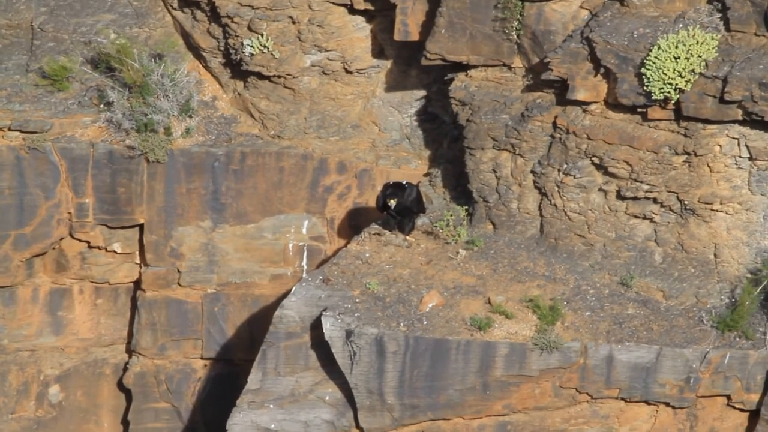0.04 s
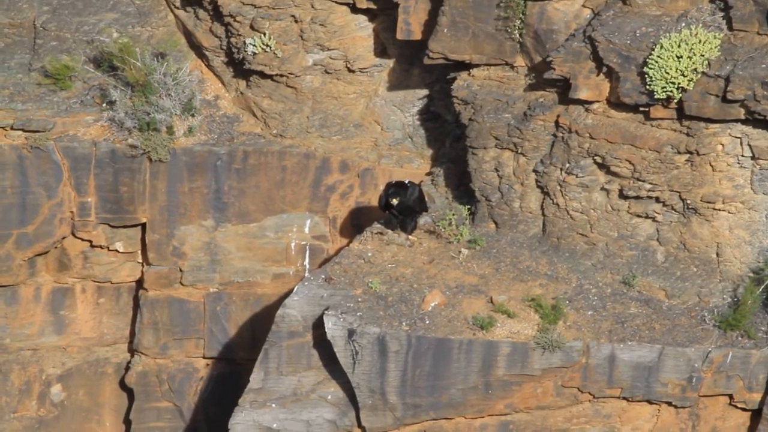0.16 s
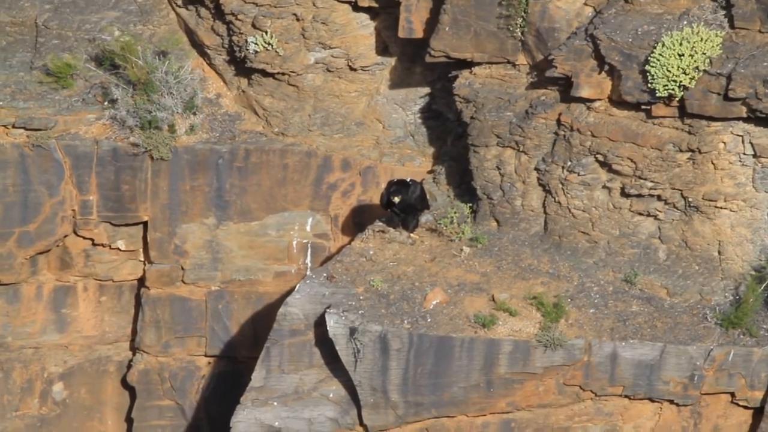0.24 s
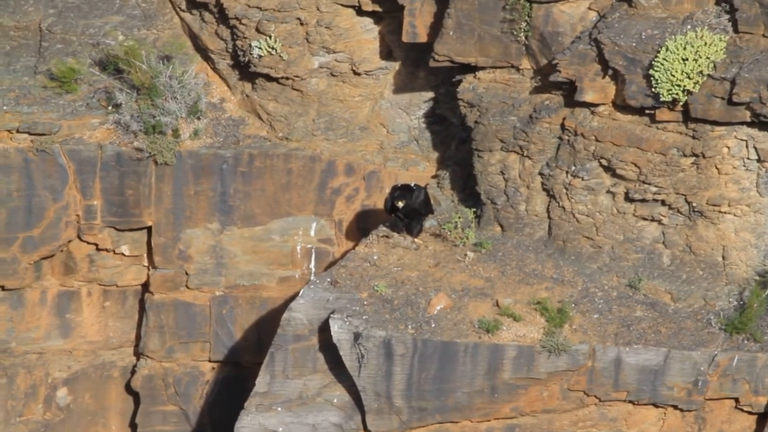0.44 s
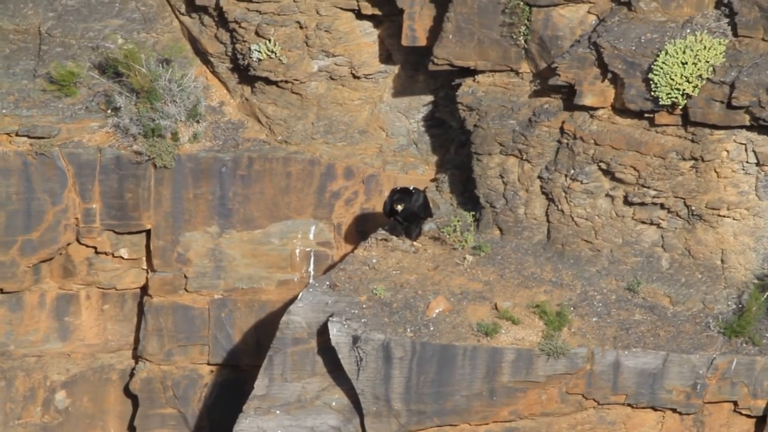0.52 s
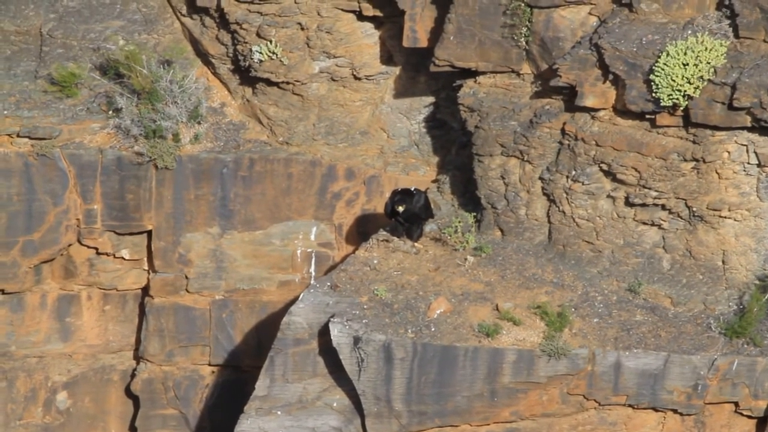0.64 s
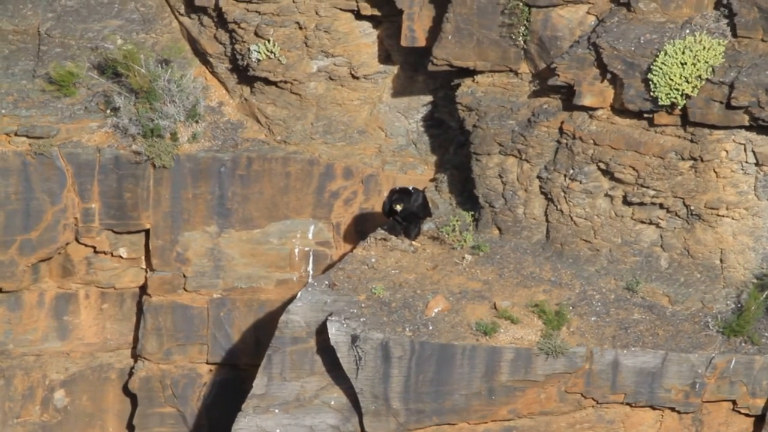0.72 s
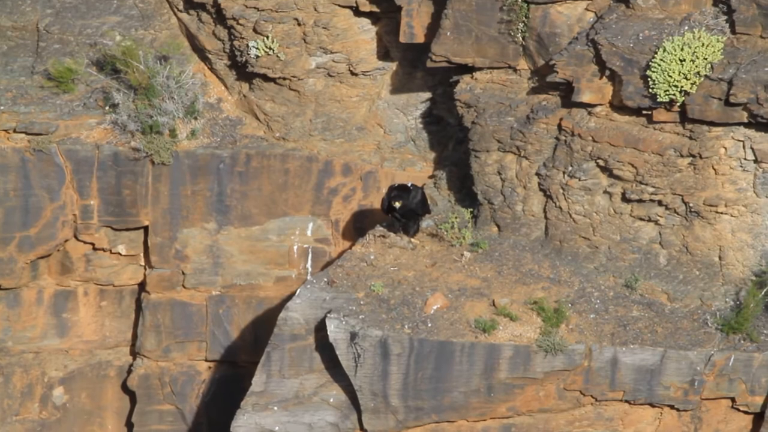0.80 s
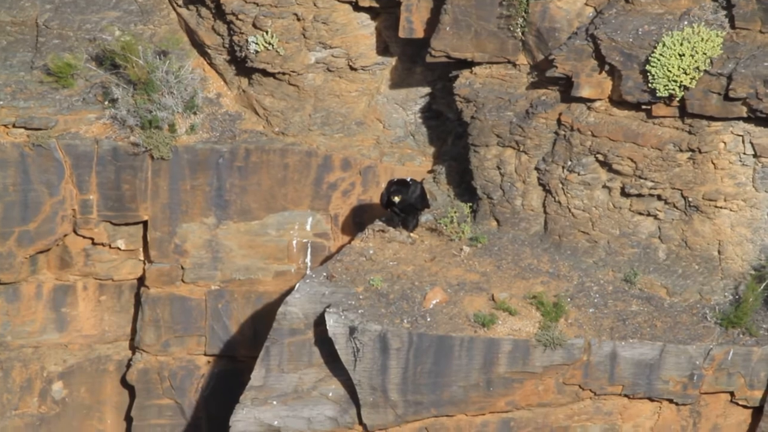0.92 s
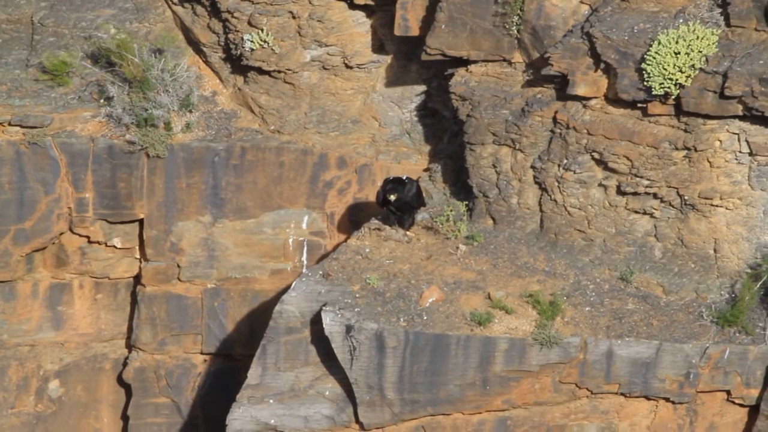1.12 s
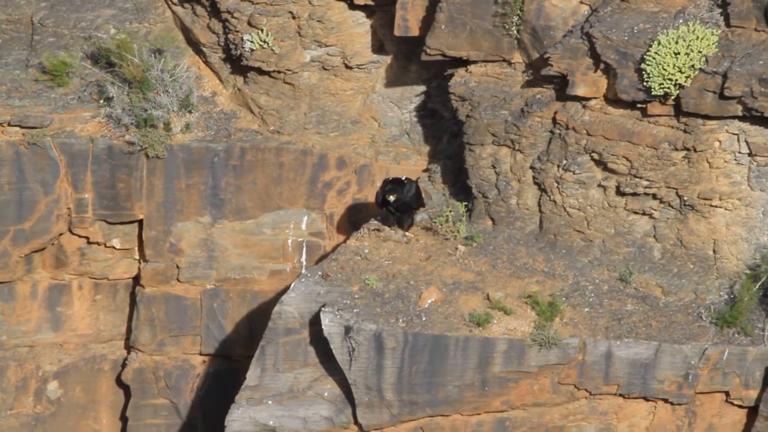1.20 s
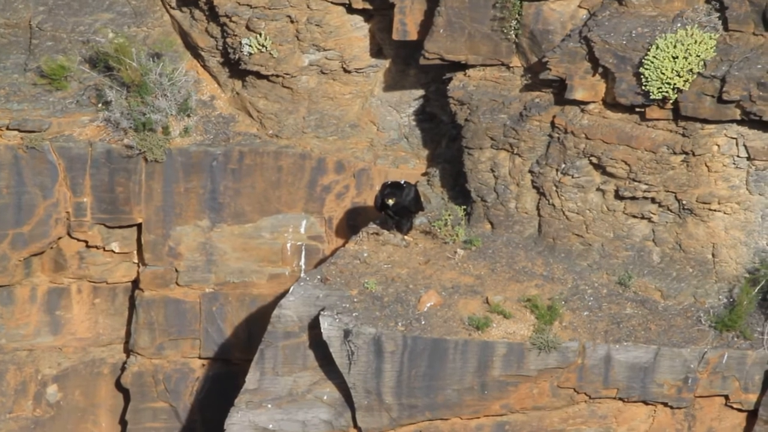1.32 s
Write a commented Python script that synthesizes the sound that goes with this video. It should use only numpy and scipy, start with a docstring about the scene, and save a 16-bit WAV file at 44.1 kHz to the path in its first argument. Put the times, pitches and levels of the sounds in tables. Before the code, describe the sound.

An eagle's short rising whistle and raspy yelp echo among rocks over faint wind.

```python
"""Faint wind blows, and the echo of an eagle's earlier call is dying away in the gorge.
From a cliff ledge the bird gives a thin rising whistle, then a harsh yelp: a buzz, a rush of air and
a loud tone that the syrinx drops in steps through more than an octave. The rock faces throw it back.
Throughout, a hollow-sounding microphone colours everything and adds its own hiss."""
import sys
import numpy as np
from scipy import signal
from scipy.fft import rfft, irfft, next_fast_len
from scipy.io import wavfile
from scipy.ndimage import map_coordinates

SR = 44100
rng = np.random.default_rng(int(sys.argv[2]) if len(sys.argv) > 2 else 0)


def int16_out(signal):
    """Quantize to a 16-bit WAV file."""
    q = np.round(np.clip(np.atleast_2d(signal).T, -1, 1) * 32767)
    wavfile.write(sys.argv[1], SR, q.astype(np.int16))


N = 59535


def amp(db):
    """Decibels to gain."""
    return 10 ** (np.asarray(db) / 20)


def unit(x):
    """Scale to rms 1."""
    return x / np.sqrt(np.mean(x ** 2) + 1e-20)


def clock():
    """Time of each sample in seconds."""
    return np.arange(N) / SR


def curves(rows):
    """Breakpoints to envelopes, one for each column after the time."""
    times, *columns = np.transpose(rows)
    return [np.interp(clock(), times, column) for column in columns]


def gate(rows, fade_s=0.005):
    """Open from a table's first time to its last, with short fades."""
    fade_in = np.clip((clock() - rows[0][0]) / fade_s + 1, 0, 1)
    fade_out = np.clip((rows[-1][0] - clock()) / fade_s + 1, 0, 1)
    return fade_in * fade_out


def wobble(rate):
    """Smooth random modulation, rate knots a second."""
    return map_coordinates(rng.standard_normal(4096), [clock() * rate], mode="mirror")


def filtered(x, response):
    """Multiply the spectrum of x by response(hz)."""
    size = 2 * next_fast_len(N)
    return irfft(rfft(x, size) * response(np.fft.rfftfreq(size, 1 / SR)), size)[:N]


def coloured(x, eq):
    """EQ through (f/Hz, level/dB) points on a log frequency axis."""
    f, db = np.transpose(eq)
    return filtered(x, lambda hz: amp(np.interp(np.log(hz + 1), np.log(f + 1), db)))


def noise(eq):
    """Coloured noise of rms 1."""
    return unit(coloured(rng.standard_normal(N), eq))


def wind(level_db=-61, swing_db=0.73):
    """A soft bed of rushing air with small, brief swells."""
    # wind colour: f/Hz, level/dB
    spectrum = [(25, -32), (70, -14), (170, -3.5), (300, 0), (700, 1.5), (950, -8), (1500, -5),
                (2200, -20.5), (4000, -40), (9000, -63)]
    # gusts: t/s, half length/s, rise/dB
    gusts = [(0.092, 0.052, 2), (0.63, .02, 1), (0.824, 0.042, 3), (1.022, 0.035, 6), (1.303, 0.044, 2.5)]
    gust_db = sum(db * np.exp(-((clock() - peak) / half) ** 2) for peak, half, db in gusts)
    return noise(spectrum) * amp(level_db + gust_db + swing_db * wobble(13.6))


def earlier_echo(start_db=-64, fade_db_per_s=13.5):
    """The tail of a previous call, a wash of noise fading in the gorge."""
    # tail colour: f/Hz, level/dB
    spectrum = [(1200, -47), (1700, 1), (2100, -1.5), (2600, 2), (3200, -14), (4500, -14.5), (8000, -49)]
    return noise(spectrum) * amp(start_db - fade_db_per_s * clock())


def scatter(delay_s, t60_s):
    """A dense cluster of reflections of energy 1 that starts after a delay and dies away."""
    age = clock() - delay_s
    impulse = rng.standard_normal(N) * (age > 0) * amp(-60 * np.abs(age) / t60_s)
    return impulse / np.linalg.norm(impulse)


def cliff_echo(call, near_db=-8.5, gorge_db=-16.5, smear_s=0.017):
    """Near scatter off the cliff, a long tail from the gorge and smeared slaps from single rock faces."""
    # slapback from each rock face: delay/s, level/dB
    faces = [(0.064, -22), (0.127, -17.5), (0.237, -26), (0.286, -30.5), (0.332, -34), (0.406, -25.5),
             (.48, -25), (0.523, -28)]
    # EQ of all the reflections: f/Hz, level/dB
    echo_eq = [(1000, 1), (1500, -3.5), (2000, 0.5), (2550, 0.5), (2800, -1), (3400, -5.5), (4200, -4.5),
               (9000, -6)]
    near = amp(near_db) * scatter(delay_s=0.022, t60_s=0.64)
    gorge = amp(gorge_db) * scatter(delay_s=0.12, t60_s=3)
    slaps = sum(amp(db) * scatter(delay, smear_s * np.log(1000)) for delay, db in faces)
    return coloured(signal.fftconvolve(call, near + gorge + slaps)[:N], echo_eq)


def whistle(octave_db=-15, jitter=0.0052):
    """A nearly pure tone that climbs; its faint octave thins out as it rises."""
    # whistle contour: t/s, f/Hz, level/dB
    contour = [(.16, 2703, -77), (.174, 2786, -56), (.19, 2996, -51), (.22, 3060, -47), (.235, 3300, -47),
               (.245, 3638, -54), (.252, 3815, -42), (.259, 3800, -51), (.264, 3300, -56)]
    hz, db = curves(contour)
    phase = cycles(hz * (1 + jitter * wobble(540)))
    octave = amp(octave_db) * (hz[0] / hz) ** 2
    return np.sqrt(2) * gate(contour) * amp(db) * (np.sin(phase) + octave * np.sin(2 * phase))


def cycles(hz):
    """Running phase of a pitch curve, in radians."""
    return 2 * np.pi * np.cumsum(hz) / SR


def beak_air(phase, pulsing=0.44):
    """Air rushing through the beak, puffed out with each pulse of the yelp."""
    # breath colour: f/Hz, level/dB
    spectrum = [(700, -38), (1300, -14), (1800, -13), (2500, 2.5), (3400, -1), (4300, -4), (5000, -4.5),
                (7000, 0), (9000, -9), (15000, -35)]
    # breath envelope: t/s, level/dB
    envelope = [(.265, -60), (.278, -51), (.297, -49), (.304, -46), (.333, -46), (.345, -55), (.36, -70),
                (.376, -76)]
    air_db, = curves(envelope)
    return amp(air_db) * noise(spectrum) * (1 + pulsing * np.cos(phase))


def buzz(phase, pulse_hz, shimmer_db=3.4):
    """The yelp's rasp: uneven pulses, built from 15 harmonics of the pulse rate."""
    # buzz colour: f/Hz, level/dB
    spectrum = [(500, -19), (1000, -25), (1450, 1), (1600, -8.5), (2000, 1), (2550, 5), (2900, -0.5),
                (3500, -1), (4100, -3), (5000, -1), (7500, -18)]
    f, db = np.transpose(spectrum)
    # flipping polarity every three harmonics spreads each pulse out
    pulses = sum(amp(np.interp(k * pulse_hz, f, db)) * np.cos(k * phase + np.pi * (k // 3))
                 for k in range(1, 16))
    return unit(pulses) * amp(shimmer_db * wobble(500))


def syrinx_tone(phase, crossfade_s=0.0044):
    """The syrinx sings on one multiple of the pulse rate, then steps down to the next."""
    # registers: start t/s, multiple of the pulse rate
    registers = [(.265, 6), (.296, 5), (.319, 4), (.337, 3)]
    # partials of the tone: harmonic number, level/dB
    partials = [(1, -1), (2, -6), (3, -13.5), (4, -16)]
    entered = [np.clip((clock() - start) / crossfade_s + .5, 0, 1) for start, _ in registers] + [0]
    tone = np.zeros(N)
    for i, (_, multiple) in enumerate(registers):
        note = sum(amp(db) * np.sin(k * multiple * phase) for k, db in partials)
        tone += (entered[i] - entered[i + 1]) * note
    return tone


def yelp(jitter=0.011):
    """A harsh cry: tone, buzz and breath, all locked to one falling pulse rate."""
    # pulse rate: t/s, f/Hz
    pulse_rate = [(.265, 559.1), (.287, 570), (.296, 537.2), (.304, 509.5), (.32, 508.5), (.33, 485.9),
                  (.338, 480.5), (.345, 450.2), (.355, 438.4), (.372, 378)]
    # force of the yelp: t/s, tone level/dB, buzz level/dB
    force = [(.265, -73, -74), (.283, -61, -62), (.289, -43.5, -54), (.298, -42, -42), (.304, -37, -42.5),
             (.317, -50, -44), (.333, -39.5, -38), (.339, -39.5, -43.5), (.349, -41, -58), (.357, -53, -68),
             (.376, -54.5, -69)]
    pulse_hz, = curves(pulse_rate)
    tone_db, buzz_db = curves(force)
    phase = cycles(pulse_hz * (1 + jitter * wobble(900)))
    tone = np.sqrt(2) * amp(tone_db) * syrinx_tone(phase)
    rasp = amp(buzz_db) * buzz(phase, pulse_hz)
    return gate(force) * (tone + rasp + beak_air(phase))


def scene():
    """Bird, echoes and wind, alike in both channels."""
    # treble loss in throat and beak: f/Hz, level/dB
    throat_eq = [(4100, -0.5), (5000, -11.5), (6500, -11), (9000, -17.5)]
    call = coloured(whistle() + yelp(), throat_eq)
    return np.tile(call + cliff_echo(call) + earlier_echo() + wind(), (2, 1))


def housing(hz):
    """Frequency response of the microphone's hollow, ringing housing."""
    # housing resonances: f/Hz, width/Hz, level/dB relative to the flat response
    resonances = [(306.2, 35.4, 12), (463.6, 85, 12), (651.4, 66.3, 12), (1361, 76, 3.5), (1508, 58, 10.5),
                  (1915, 58, 11), (2036, 114, 12), (2570, 53, 11), (3080, 48, 0.5), (3450, 99, 7),
                  (3830, 117, 4), (4025, 40, 9.5), (4590, 110, 5), (5000, 90, -12)]
    power = 1 + sum(amp(db) ** 2 / (1 + 2 * ((hz - centre) / width) ** 2) ** 2
                    for centre, width, db in resonances)
    # fold the cepstrum for minimum phase, so the ring follows the sound
    cepstrum = irfft(np.log(power) / 2)
    cepstrum[1:len(hz) - 1] *= 2
    cepstrum[len(hz):] = 0
    return np.exp(rfft(cepstrum))


def record(dry, hiss_db=-61, top_hz=15800):
    """One microphone: housing resonances, hiss and a brick-wall high cut."""
    # hiss colour: f/Hz, level/dB
    hiss_spectrum = [(30, -9.5), (1000, 0), (4300, 0), (7000, -3), (12000, -5.5), (15700, -11.5)]
    mono = filtered(dry.mean(axis=0), housing) + amp(hiss_db) * noise(hiss_spectrum)
    return np.tile(filtered(mono, lambda hz: hz < top_hz), (2, 1))


dry = scene()
out = record(dry)
int16_out(out)
```